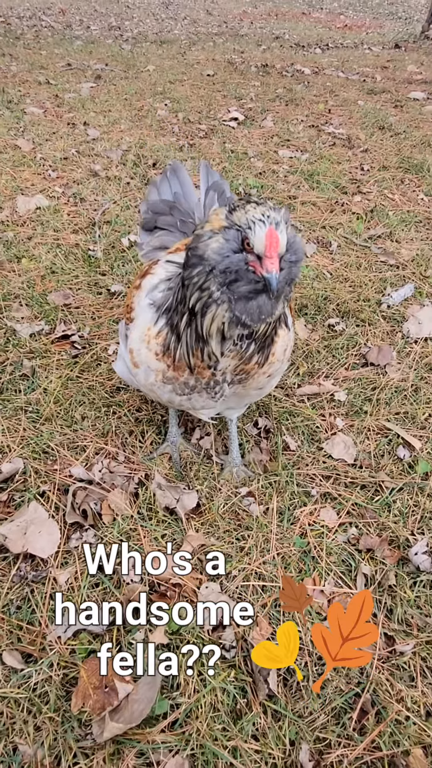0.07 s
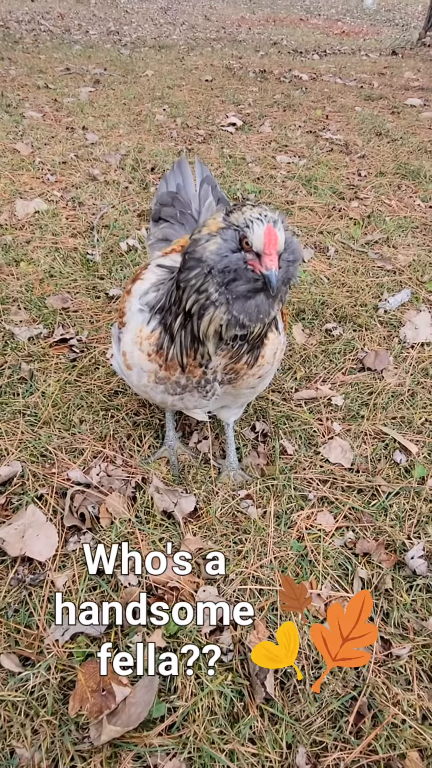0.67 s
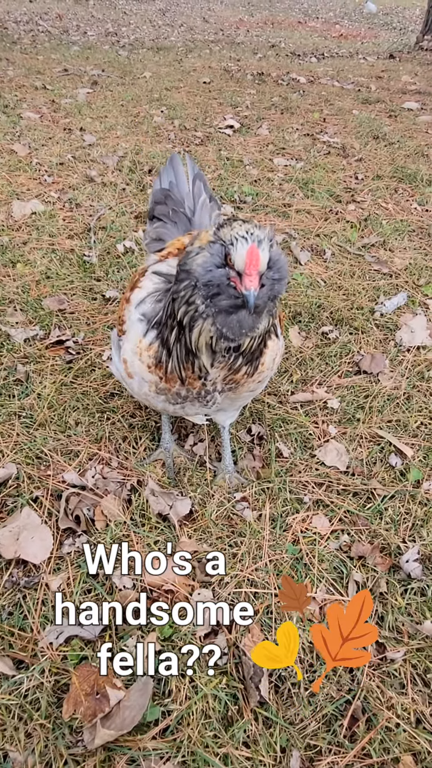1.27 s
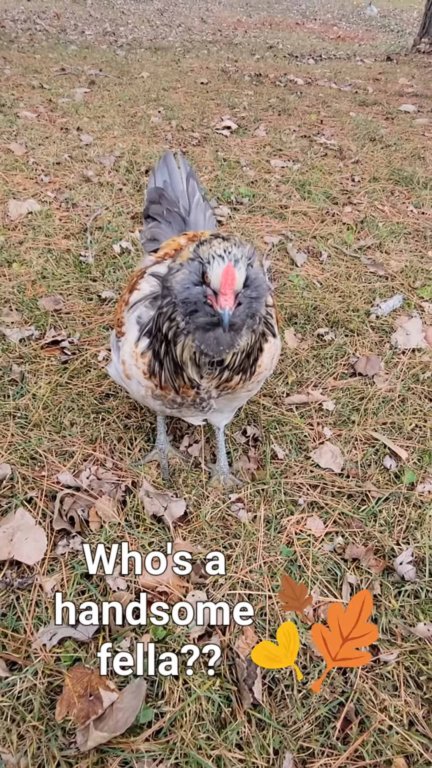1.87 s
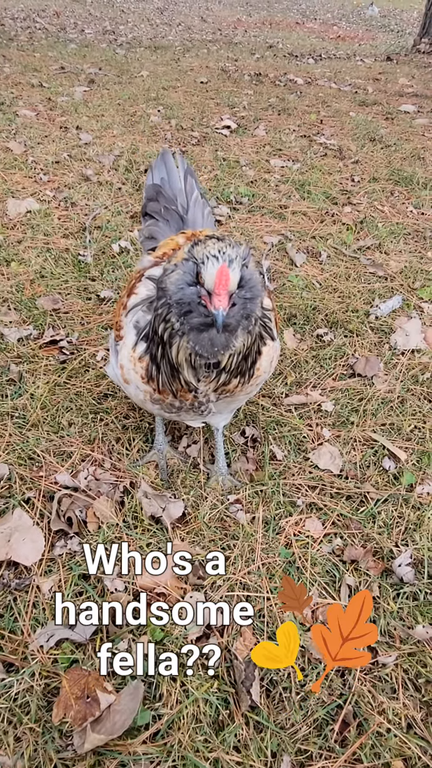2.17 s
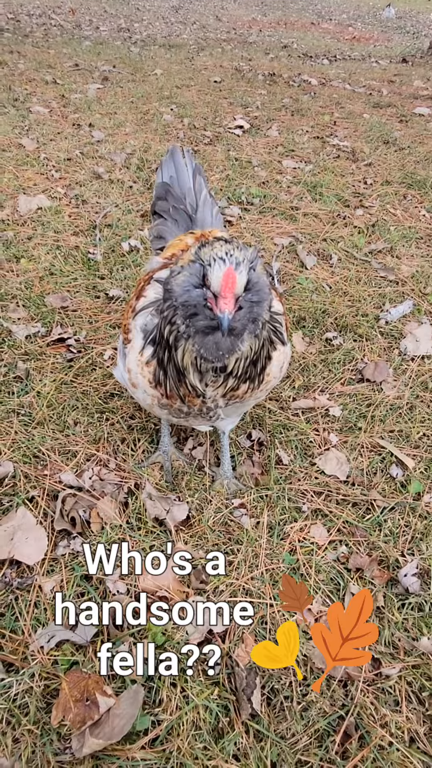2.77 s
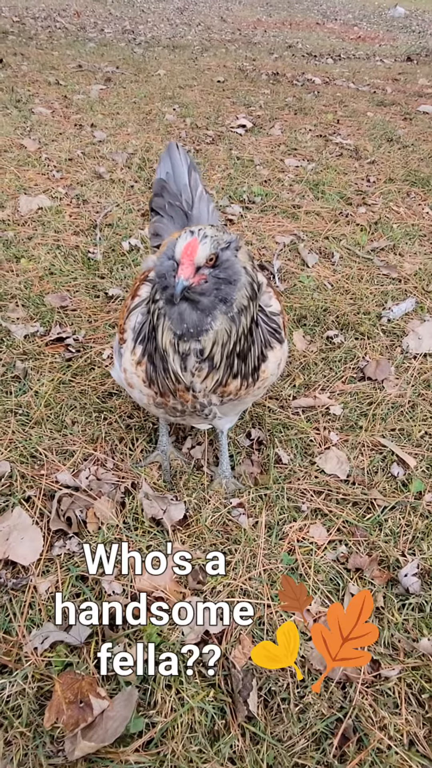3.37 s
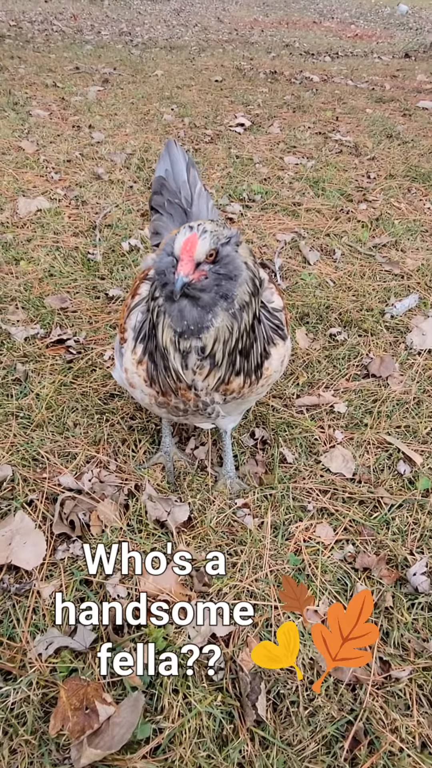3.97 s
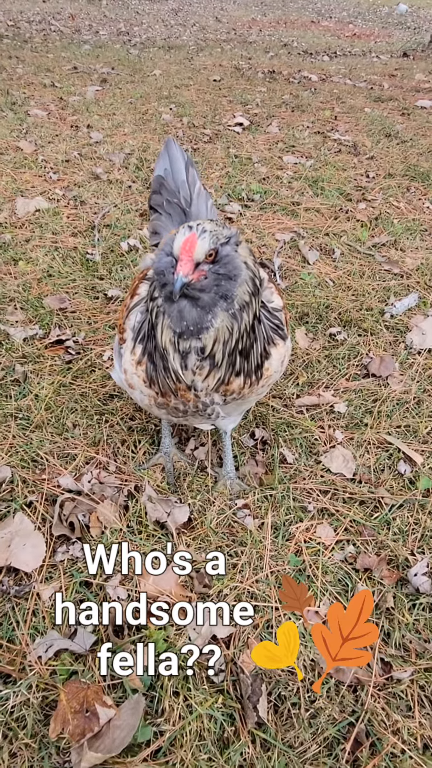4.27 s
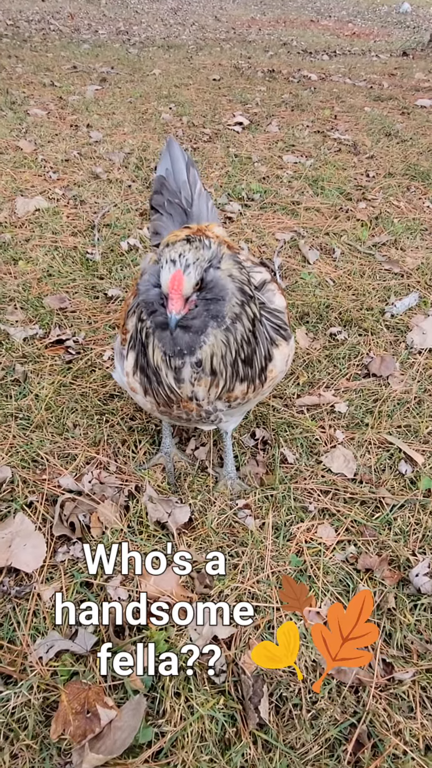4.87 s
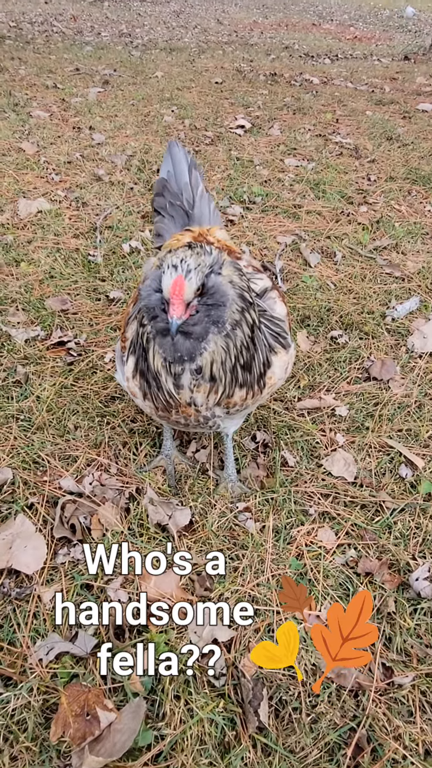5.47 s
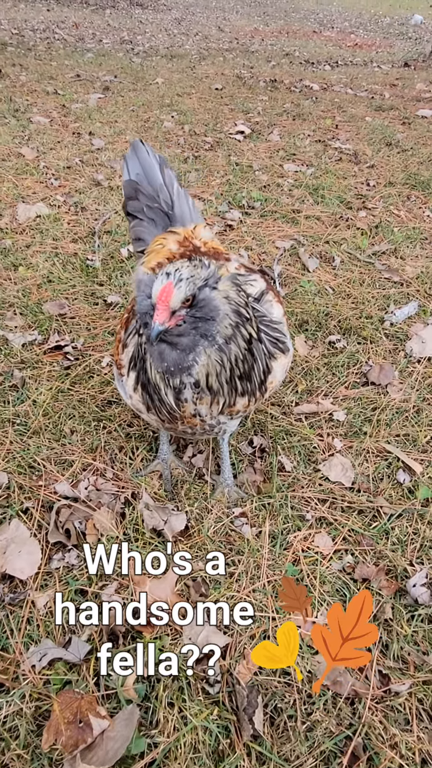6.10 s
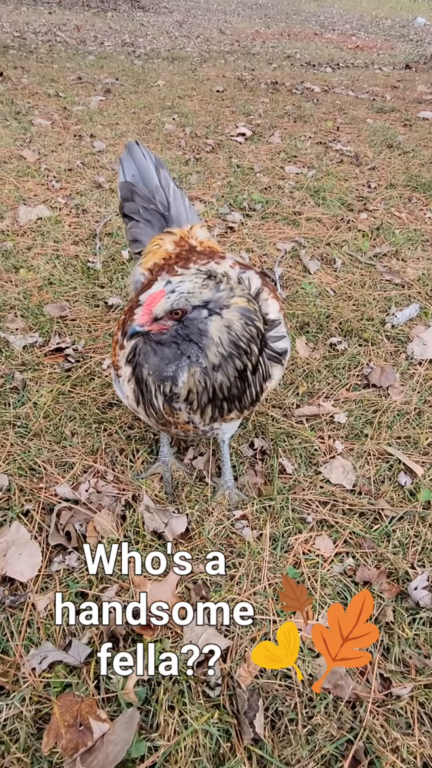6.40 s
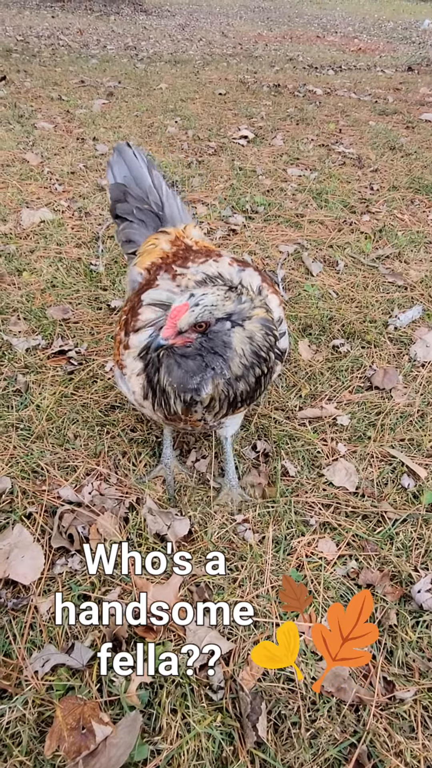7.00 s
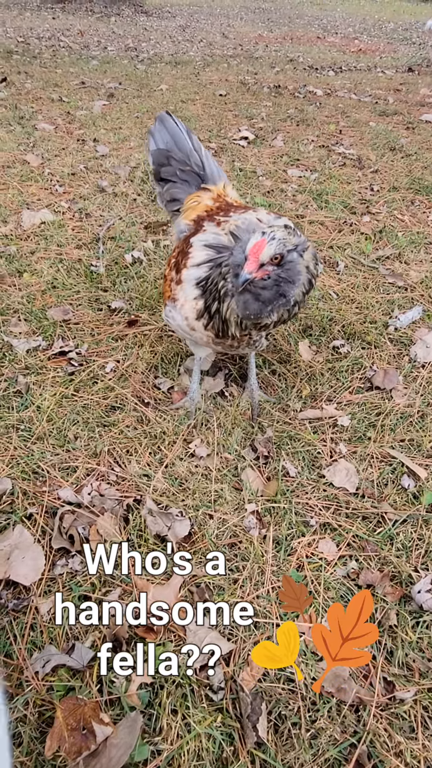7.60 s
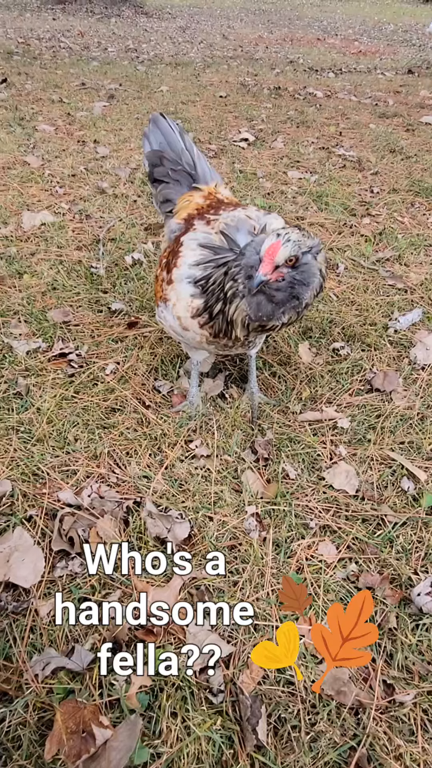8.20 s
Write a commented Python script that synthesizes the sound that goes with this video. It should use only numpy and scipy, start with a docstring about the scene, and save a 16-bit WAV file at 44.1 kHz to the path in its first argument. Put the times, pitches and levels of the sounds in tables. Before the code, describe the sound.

Close to the microphone, a rooster gives a few short, throaty clucks. Further off to the left, a second rooster crows, its call breaking between a hoarse rasp and a clear tone and echoing among trees. The near bird then clucks again in a longer run and steps through dry leaves, with feathers rustling and stalks snapping. Faint traffic rumbles in the distance.

```python
"""Short, throaty clucks come in two runs from a rooster close to a phone, each a few cycles of its syrinx.
It ruffles its feathers and steps through dry leaves on the grass; stalks snap and a hand bumps the phone.
Between the runs a second rooster crows further off, its syrinx breaking between a hoarse rasp and a
clear tone, and the trees echo it. Distant traffic rumbles underneath."""
import sys
import numpy as np
from scipy import signal
from scipy.fft import rfft, irfft, next_fast_len
from scipy.io import wavfile
from scipy.ndimage import uniform_filter1d, map_coordinates

SR = 44100
rng = np.random.default_rng(int(sys.argv[2]) if len(sys.argv) > 2 else 0)


def unload_audio(sound):
    """Save the sound as a 16-bit wav file, at the path given as the first command line argument."""
    columns = np.transpose(np.atleast_2d(sound))
    # keep every value between -1 and 1, then stretch to whole-number steps
    steps = np.round(np.clip(columns, -1, 1) * 32767)
    wavfile.write(sys.argv[1], SR, steps.astype(np.int16))


N = 363825

# the near bird's calls: t/s, length/s, pitch/Hz, relative level/dB, beak resonance/Hz, treble/dB,
# roughness/0-1, left-right/dB, left lead of the low tones/rad
CLUCKS = [(0.044, 0.029, 261, -37, 3300, 8.5, 0.76, 4.5, 5),
          (0.349, .0174, 346, -17, 3060, 0.5, 0.3, 2, 1.84),
          (0.568, .0234, 296.3, -16.5, 2840, -6.5, 0.3, 2, 0.6),
          (0.8344, 0.023, 232.9, -19.5, 2830, -2.5, 0.4, 2, 1.5),
          (1.2183, 0.0282, 761, -39, 2620, 7, 0.4, 12, 5),
          (2.1324, 0.029, 296, -38.5, 2660, 10.5, 0.65, 4, 2),
          (5.4864, 0.029, 238, -19.5, 3160, 3, 0.2, 0, 0.8),
          (5.6655, .0263, 243.4, -17.5, 3220, -1.5, 0.08, -0.5, 1.5),
          (5.854, 0.026, 243.1, -18, 3120, 2.5, .1, -0.5, 1.5),
          (6.0493, 0.025, 258.8, -17.5, 3170, 4, 0.3, -2.5, 1),
          (6.3053, .0184, 247.5, -21, 3050, -2.5, 0.4, -1.5, 1.1),
          (6.5498, 0.014, 251.2, -19, 2880, -2.5, 0.3, -3, 0.5),
          (6.8862, .0297, 246.7, -16, 3250, 5, 0.2, -2.5, 1.5),
          (7.0665, .028, 262.7, -13.5, 3300, 8.5, 0.3, -3, 1.74),
          (7.3198, .0269, 245.7, -16.5, 2810, 6.5, 0.3, -2, 1.56)]
# the crowing bird's throat in its hoarse register: f/Hz, gain/dB
HOARSE_THROAT = [(600, -37), (950, -4.5), (1400, -14.5), (1900, 0.5), (2800, -8), (3300, -2), (3750, 9),
                 (4300, -15), (4800, 0.5), (5700, -19), (7500, -24), (11000, -29), (15000, -50)]


def clucks(rise_s=.014, fall_s=.009, spill_s=.0033, swell_hz=3000, rasp=.44, puff_db=-38, puff_s=.016):
    """Each cluck is a few cycles of the syrinx; the upper harmonics swell in last and leave first."""
    # the near bird's throat: f/Hz, gain/dB
    throat_shape = [(120, -27), (240, -12), (340, -20), (500, -9.5), (680, 2), (780, 2), (1000, -8.5),
                    (1250, -20), (1550, -31), (1950, -25), (2350, -37), (3500, -38), (4400, -43.5),
                    (8000, -63), (15000, -56)]
    # the ground's reflection colours each microphone port differently: f/Hz, left-right/dB, left lead/rad
    ports = [(244, -4, -1.35), (540, 14, -0.42), (710, -3, -1), (956, 4.5, -3.5), (1200, 5.5, -0.7),
             (1410, 3.5, -2.5), (1900, -4, -2.5), (2700, 6, -2.5), (5000, 4, -2.5)]
    port_hz, port_db, port_lead = np.transpose(ports)
    out, size = np.zeros((2, N)), 4096
    t = np.arange(size) / SR - .03
    for s, length, pitch_hz, db, beak_hz, treble_db, rough, pan_db, low_lead in CLUCKS:
        treble = lambda hz: treble_db * np.clip((hz - 900) / 1500, 0, 1)
        throat = lambda hz: amp(along(throat_shape, hz) + treble(hz) + beak(hz, beak_hz))
        effort = envelope(t + spill_s, length + 2 * spill_s, rise_s, fall_s) ** 2
        droop = (.011 + .1496 * rough) * np.clip(t / length - .5, -1, 1)
        pitch = pitch_hz * (1 - droop + .099 * rough * wobble(250, size))
        phase = 2 * np.pi * np.cumsum(pitch) / SR
        k = np.arange(1, int(9000 / pitch_hz))[:, None]
        harmonics = throat(k * pitch_hz) * effort ** (1 + k * pitch_hz / swell_hz)
        # the throat delays the harmonics unequally, so the pulses blur into a round tone
        tone = np.sum(harmonics * np.cos(k * phase + np.pi * np.log(k) ** 2), axis=0)
        # turbulence bursts once a cycle; a faint puff of air trails the call
        hiss = rng.standard_normal(size) * np.sqrt(SR / pitch_hz) / 2
        pulsed_air = hiss * effort ** 2 * (1 + np.cos(phase))
        burst = filtered(pulsed_air, lambda hz: throat(hz) * (rough + rasp * np.clip(hz / 3000, 0, 3)))
        breath = filtered(hiss, lambda hz: amp(puff_db) * throat(hz) * (1 + np.minimum(hz, 3000) / 300))
        puff = breath * np.clip(t / rise_s + 1, 0, 1) ** 2 * np.exp(-np.maximum(t - length, 0) / puff_s)
        voice = lead(tone + burst + puff, np.c_[port_hz, port_lead + low_lead * (port_hz < 900)])
        balance = np.c_[port_hz, port_db + pan_db]
        voice = filtered(voice, lambda hz: amp(along(balance, hz) * np.array([[.5], [-.5]])))
        add(out, s + t[0], amp(db - 2) * np.sqrt(length * SR / size) * unit(voice))
    return out


def beak(hz, beak_hz, peak_db=12, dip_db=-11, dip_ratio=.77, dip_width_hz=125):
    """The opening beak raises and widens a resonance, with an antiresonance just below it; in dB."""
    width_hz = 440 * (beak_hz / 3000) ** 2.5
    return peak_db * bell(hz, beak_hz, width_hz) + dip_db * bell(hz, dip_ratio * beak_hz, dip_width_hz)


def near_rooster(notch_hz=415, notch_width_hz=50, notch_db=-9):
    """The reflection off the ground cancels a narrow band of the clucks and adds a short, faint tail."""
    # decay of the ground's tail: f/Hz, t60/s
    ground_t60 = [(300, .1), (1000, .11), (4000, .14), (12000, .08)]
    voice = filtered(clucks(), lambda hz: amp(notch_db * bell(hz, notch_hz, notch_width_hz)))
    return voice + amp(-32) * echo(voice[0], ground_t60, build_s=.0073, size=SR // 4)


def hoarse_crow(scoop=.1, scoop_s=.011, sink=.035, waver=.008, jitter=.04, rasp=2.1):
    """The syrinx beats irregularly: the rougher, the more its harmonics smear into a rasp."""
    # hoarse syllables: t/s, length/s, pitch/Hz, relative level/dB, crescendo/dB, roughness/0-1,
    # fullness either side of the main resonance/dB
    syllables = [(2.947, 0.21, 968, -48, 5, 0.58, 1), (3.272, 0.077, 982, -42, -6, 0.81, -3),
                 (3.425, 0.12, 911, -43, -6, .95, -1), (3.699, .135, 934, -44, 6, 0.71, -1),
                 (4.000, .1, 981, -44, 1, .25, -9.5)]
    out, size = np.zeros(N), SR // 2
    t = np.arange(size) / SR
    for s, length, pitch_hz, db, crescendo_db, rough, body_db in syllables:
        progress = np.minimum(t / length, 1)
        # every syllable scoops up to its pitch and sinks as it ends
        bend = 1 - scoop * np.exp(-t / scoop_s) - sink * progress ** 3
        pitch = pitch_hz * (bend + waver * wobble(40, size))
        phase = 2 * np.pi * np.cumsum(pitch * (1 + jitter * rough * wobble(299, size))) / SR
        buzz = unit(sum(np.cos(k * phase) for k in range(1, 13)))
        air = rasp * rough ** 2 * rng.standard_normal(size) * (1 + np.cos(phase))
        flutter = amp(3 * rough * wobble(240, size))
        body = lambda hz: body_db * np.clip(np.abs(hz - 3800) / 1500, 0, 1)
        voice = filtered((buzz + air) * flutter, lambda hz: amp(along(HOARSE_THROAT, hz) + body(hz)))
        # the air pressure, not the roughness, sets the loudness
        voice /= np.sqrt(np.abs(uniform_filter1d(voice ** 2, size=1024)) + 1e-9)
        pressure = amp(db + crescendo_db * (progress - .5) + 1.15 * wobble(45, size))
        add(out, s, voice * pressure * envelope(t, length, attack_s=.01, release_s=.032))
    return out


def clear_crow(settle_s=.042, sag_hz_per_s=35, jitter=.0035, flutter_db=2, rasp_db=-30, fade_db=-19.5):
    """The syrinx locks into a high, steady tone with a strong second harmonic and a little rasp."""
    # clear notes: t/s, length/s, settled pitch/Hz, opening overshoot/Hz, level/dB
    notes = [(3.111, 0.022, 1194, -13, -41), (3.301, 0.26, 1229, 139.5, -41.5),
             (3.752, .32, 1221, 20.5, -41.5)]
    # the throat in its clear register: f/Hz, gain/dB
    throat = [(700, -44.5), (1230, -13), (2450, 4), (3700, -10), (4900, -5.5), (6100, -30.5), (7350, -25.5),
              (8600, -77), (9800, -32.5), (12000, -47), (15000, -47)]
    out, size = np.zeros(N), SR // 2
    t = np.arange(size) / SR
    for s, length, pitch_hz, overshoot_hz, db in notes:
        # every note settles, sags slowly, then drops and fades in its last third as the air runs out
        spent = np.clip(1 - (1 - t / length) / .33, 0, 1)
        push_hz = overshoot_hz * np.exp(-t / settle_s)
        pitch = (pitch_hz + push_hz - sag_hz_per_s * t) * (1 - .075 * spent)
        phase = 2 * np.pi * np.cumsum(pitch * (1 + jitter * wobble(300, size))) / SR
        tone = unit(sum(amp(along(throat, k * pitch)) * np.sin(k * phase) for k in range(1, 12)))
        rasp = amp(rasp_db) * unit(coloured(rng.standard_normal(size), HOARSE_THROAT))
        push_db = .0778 * push_hz  # the push that overshoots the pitch is louder too
        level = amp(db + push_db + fade_db * spent + flutter_db * wobble(110, size))
        add(out, s, level * envelope(t, length, attack_s=.027, release_s=.012) * (tone + rasp))
    return out


def far_rooster():
    """The crow comes from the left; nearby trunks scatter it and the trees beyond hold a long tail."""
    # decay among the trees: f/Hz, t60/s
    trees_t60 = [(300, 0.7), (1200, 2.84), (2450, 1.68), (3800, 0.82), (6000, 0.38), (12000, 0.21)]
    # the crow reaches the left port first: f/Hz, left lead/rad
    crow_lead = [(300, 0.79), (1200, 3.9), (2450, 3.84), (3800, 7.2), (5000, 9.4), (7300, 11.7),
                 (10000, 11)]
    trunks_t60 = [(1000, .88), (4000, .31), (12000, .08)]
    hoarse, clear = amp(-3) * hoarse_crow(), clear_crow()
    trunks = amp(-12) * echo(hoarse + clear, trunks_t60, build_s=.0062, size=SR // 2)
    # the clear notes carry farthest
    trees = amp(-16.5) * echo(amp(-1) * hoarse + clear, trees_t60, build_s=.01, size=2 * SR)
    return (lead(hoarse + clear, crow_lead) + trunks + trees) * amp([[2.8], [-2.8]])


def rustle_and_hiss(grain_db=2.5, clump_db=2.5, crackles_per_s=160, jerk_s=.03):
    """Clumps of tiny grains and sharper crackles make rubbing feathers and leaves, and the crow's hiss."""
    # swells of bright hiss: the near bird's feathers and leaves, and at 3.4 s and 3.88 s the breathy
    # hiss of the far crow: peak t/s, length/s, relative level/dB
    swells = [(.18, .035, -68), (.255, .035, -66.5), (.34, .03, -64), (1.08, 0.35, -76.5),
              (1.862, .04, -72), (2.28, 0.031, -71), (2.565, 0.088, -63.5), (2.725, 0.12, -67.5),
              (3.4, 0.31, -69), (3.88, 0.7, -72), (4.43, .07, -67.5), (5.225, 0.23, -72),
              (5.56, 0.079, -67), (5.84, 0.11, -67.5), (6.11, 0.11, -72), (6.338, .035, -55.5),
              (6.42, .17, -67), (7.03, 0.069, -64), (7.095, .08, -53.5), (7.228, .075, -45),
              (7.425, 0.18, -48), (7.53, 0.1, -48), (7.755, .105, -54.5), (7.93, 0.17, -70.5),
              (8.195, 0.077, -64)]
    # their dry, bright colour: f/Hz, gain/dB
    colour = [(240, -52), (400, -16), (718, -10.5), (918, -9.5), (1620, -10.5), (1780, -5), (2040, -9.5),
              (4340, -1.5), (5140, -5), (6180, 1), (11300, -9), (13300, 0), (15800, -5.5)]
    # every cluck jerks the neck feathers
    jerks = [(s + length / 2, jerk_s, db - 50.5) for s, length, _, db, *_ in CLUCKS]
    power = sum((amp(db) * swell(s, length)) ** 2 for s, length, db in list(swells) + jerks)
    idle = amp(-81.5 + wobble(6.3))  # the feathers never quite lie still
    grains = amp(grain_db * np.array([wobble(1500), wobble(1500)]) + clump_db * wobble(70))
    hiss = unit(grains * noise(colour, alike=.13))
    ticks = (rng.random(N) < crackles_per_s / SR) * rng.standard_normal((2, N))
    crackle = unit(np.array([resonate(side, colour) for side in ticks]))
    return np.sqrt(power + idle ** 2) * (amp(4) * hiss + amp(-2) * crackle)


def swell(s, length, rise=.5, fall=.73, roundness=1.6):
    """A swell rises to its peak at time s and dies a little more slowly."""
    from_peak = (np.arange(N) / SR - s) / length
    return np.exp(-np.minimum(np.maximum(-from_peak / rise, from_peak / fall), 9) ** roundness)


def snaps(size=1024, t60=.015):
    """A dry stalk breaks with a short crack."""
    # breaking stalks: t/s, relative level/dB, weight of the low crack/dB
    stalks = [(1.1405, -42.5, -17), (2.8877, -48, -3), (5.2195, -33.5, -24), (5.5459, -40, -36),
              (6.327, -56, 11.5), (6.34, -47, -2), (6.4223, -44, -16), (6.569, -49, -13),
              (7.016, -44, -16.5), (7.1788, -36, -2.5), (7.2812, -33, -17), (7.4958, -27.5, -7.5),
              (7.544, -33, -10), (7.612, -35, -27.5), (7.6255, -34.5, -19), (7.6833, -40.5, -29.5)]
    out, t = np.zeros((2, N)), np.arange(size) / SR
    for s, db, low_db in stalks:
        crack = rng.standard_normal((2, size)) * amp(-60 * t / t60)
        colour = [(500, low_db - 23), (2500, low_db + 12), (6000, 3.5), (15000, -4)]
        add(out, s, amp(db - 3.5) * coloured(crack, colour))
    return out


def bumps(size=8192):
    """The hand nudges the phone: dull, short thuds, mostly at the left port."""
    # soft nudges: t/s, relative level/dB, t60/s, weight of the knock/dB
    nudges = [(2.889, -32, 0.227, -12), (2.923, -41.5, 0.014, 5.5), (3.74, -46.5, 0.131, -7)]
    out, t = np.zeros(N), np.arange(size) / SR
    bass = [(15, 3), (40, -1.5), (120, -12)]
    for s, db, t60, knock_db in nudges:
        push = rng.standard_normal(size) * amp(-60 * t / t60)
        knock = [(400, knock_db - 17), (1200, knock_db - 33), (4000, knock_db - 56)]
        thud = resonate(push, bass + knock)
        add(out, s, amp(db) * thud / np.abs(thud).max())
    return out * amp([[3], [-6]])


def traffic():
    """Distant traffic: a deep rumble under road noise, each wavering in level."""
    # ebb and flow of the traffic: t/s, relative rumble level/dB, relative road level/dB
    flow = [(0.0, -57.5, -66), (2.09, -59, -71), (3.06, -60.5, -66), (3.26, -61, -70), (3.7, -59, -65),
            (4.2, -62, -65.5), (5.42, -58, -70), (6.02, -61.5, -65.5), (7.1, -60, -66.5),
            (8.25, -58, -71.5)]
    # colour of the rumble: f/Hz, gain/dB
    rumble_colour = [(12, -45), (20, -14), (59, -4.5), (75, 3), (95, -10), (105, -8.5), (114, -15.5),
                     (170, -27.5), (220, -50.5), (370, -120)]
    # colour of the road noise: f/Hz, gain/dB
    road_colour = [(82, -37), (140, -5), (193, 0), (232, 0.5), (293, -1.5), (376, -9), (502, -9.5),
                   (719, -12), (933, -28), (1200, -27.5), (1560, -66.5), (2640, -120)]
    rumble_db, road_db = curves(flow)
    rumble = noise(rumble_colour, alike=.7) * amp(rumble_db + 4 + 2 * wobble(5.5))
    road = amp(road_db + 3.5 + 2.2 * wobble(5)) * noise(road_colour, alike=.32)
    return rumble * amp([[.8], [-.8]]) + road


def engine(hum_hz=288.5, width_hz=22):
    """One far engine, a narrow band of noise, hums unsteadily and fades away."""
    # loudness of the hum: t/s, level/dB
    fade = [(0, -67), (1.5, -69), (1.85, -78.5), (2.45, -66.5), (3, -81), (8.25, -83)]
    level_db, = curves(fade)
    hum = filtered(rng.standard_normal(N), lambda hz: bell(hz, hum_hz, width_hz))
    return amp(level_db) * unit(hum)


def open_air():
    """A thin, even hiss spreads wide behind everything."""
    # colour of the hiss: f/Hz, gain/dB
    colour = [(530, -29.5), (900, -5), (1240, -9.5), (1540, -10.5), (1870, -10.5), (2380, -9.5),
              (4130, -13), (4600, -14), (8070, -24), (15800, -32.5)]
    return amp(-74.5) * noise(colour, alike=.091)


def amp(db):
    """Decibels to gain."""
    return 10 ** (np.asarray(db) / 20)


def unit(x):
    """Scale to rms 1."""
    return x / np.sqrt(np.mean(x ** 2) + 1e-20)


def bell(hz, centre_hz, width_hz):
    """A bell curve of height 1."""
    return np.exp(-((hz - centre_hz) / width_hz) ** 2)


def along(points, hz):
    """Interpolate (f/Hz, value) points on a log frequency axis."""
    f, v = np.transpose(points)
    return np.interp(np.log(hz + 1), np.log(f + 1), v)


def curves(rows):
    """One value per sample for each column after the time."""
    s, *cols = np.transpose(rows)
    return [np.interp(np.arange(N) / SR, s, c) for c in cols]


def wobble(rate, size=N):
    """A smooth random curve, rate knots a second."""
    knots = rng.standard_normal(int(size * rate / SR) + 4)
    return map_coordinates(knots, [np.arange(size) * rate / SR])


def envelope(t, length, attack_s, release_s):
    """Attack, hold and release of one call."""
    return np.sin(np.pi / 2 * np.clip(np.minimum(t / attack_s, (length - t) / release_s), 0, 1))


def filtered(x, response):
    """Multiply the spectrum of x by a response of frequency."""
    n = x.shape[-1]
    m = next_fast_len(n + 8192)
    return irfft(rfft(x, m) * response(np.fft.rfftfreq(m, 1 / SR)), m)[..., :n]


def coloured(x, colour):
    """Equalise x by (f/Hz, gain/dB) points."""
    return filtered(x, lambda hz: amp(along(colour, hz)))


def resonate(x, colour, size=2048):
    """Causal filter through (f/Hz, gain/dB) points: it rings after each pulse."""
    cepstrum = irfft(along(colour, np.fft.rfftfreq(size, 1 / SR)) * np.log(10) / 20)
    cepstrum[1:size // 2] *= 2
    cepstrum[size // 2 + 1:] = 0
    return signal.fftconvolve(x, irfft(np.exp(rfft(cepstrum))))[:len(x)]


def noise(colour, alike):
    """Coloured stereo noise of rms 1 with a given left-right likeness."""
    turn = np.arccos(np.clip(alike, -1, 1)) / 2
    mid, side = coloured(rng.standard_normal((2, N)), colour) * [[np.cos(turn)], [np.sin(turn)]]
    return unit(np.array([mid + side, mid - side]))


def lead(x, points):
    """Stereo pair in which the left port leads by a phase that depends on frequency."""
    return filtered(x, lambda hz: np.exp(.5j * along(points, hz) * np.array([[1], [-1]])))


def echo(x, t60, build_s, size):
    """A diffuse stereo tail in which each frequency dies at its own speed."""
    hz, t, bands = signal.stft(rng.standard_normal((2, size)), SR, nperseg=256)
    decay = amp(-60 * t / along(t60, hz)[:, None])
    _, tail = signal.istft(bands * decay * (1 - np.exp(-t / build_s)), SR, nperseg=256)
    return signal.fftconvolve(x[None], tail / np.linalg.norm(tail[0]), axes=1)[:, :N]


def add(track, s, sound):
    """Mix a sound into a track at time s."""
    part = track[..., round(s * SR):][..., :sound.shape[-1]]
    part += sound[..., :part.shape[-1]]


def scene():
    """Both birds and the small close noises over a bed of traffic and open air."""
    foreground = near_rooster() + far_rooster() + rustle_and_hiss() + snaps() + bumps()
    return foreground + traffic() + engine() + open_air()


def record(dry, top_hz=15900):
    """The phone keeps nothing above its band limit."""
    return filtered(dry, lambda hz: hz < top_hz)


dry = scene()
out = record(dry)
unload_audio(out)
```